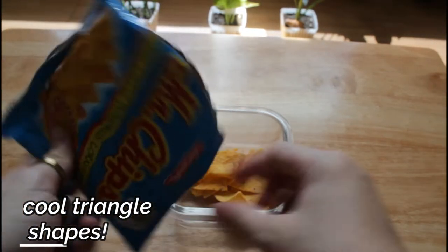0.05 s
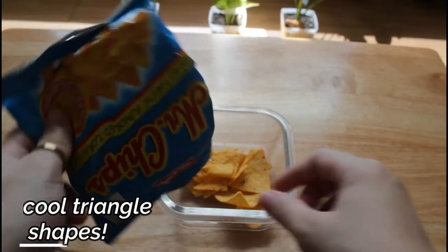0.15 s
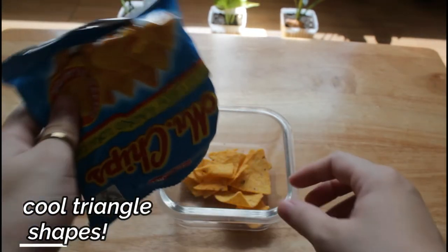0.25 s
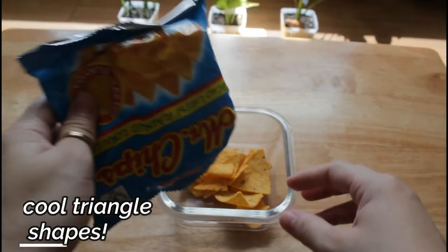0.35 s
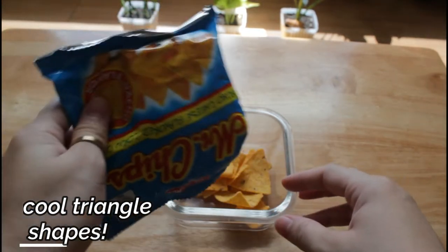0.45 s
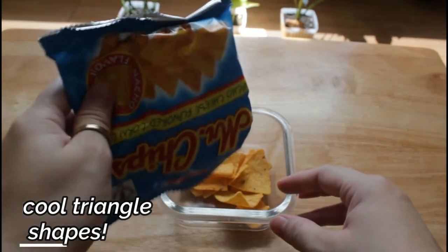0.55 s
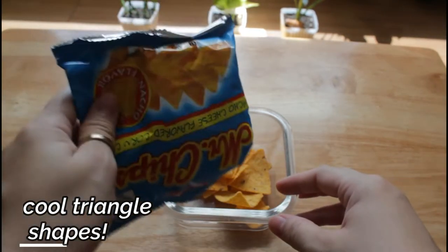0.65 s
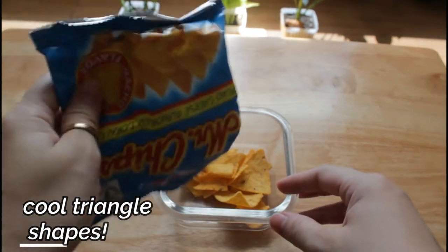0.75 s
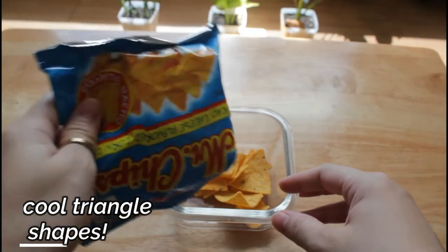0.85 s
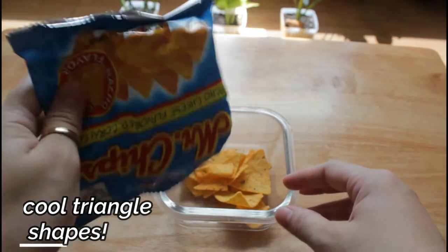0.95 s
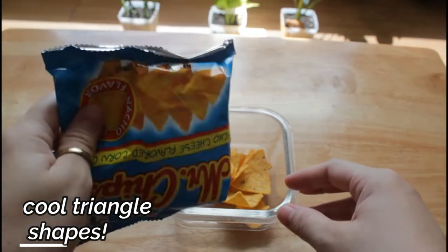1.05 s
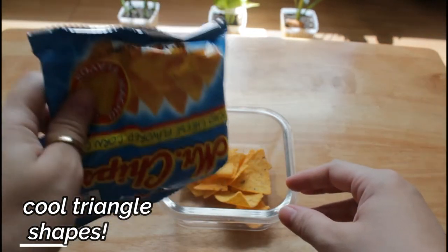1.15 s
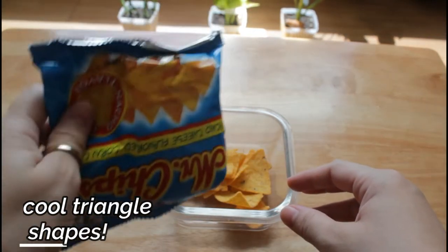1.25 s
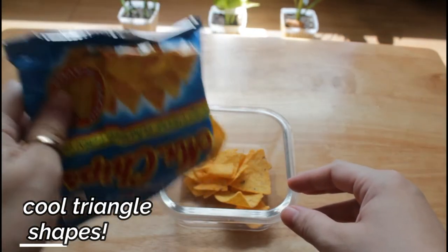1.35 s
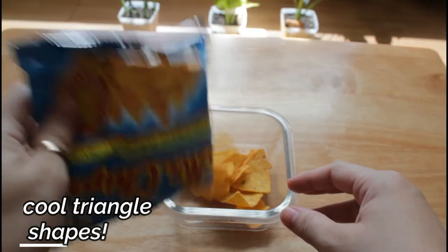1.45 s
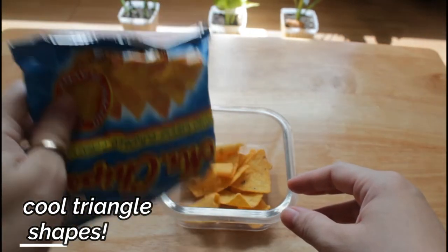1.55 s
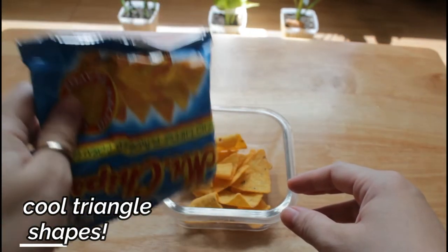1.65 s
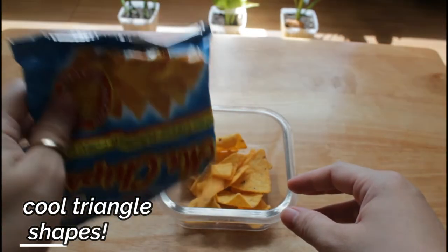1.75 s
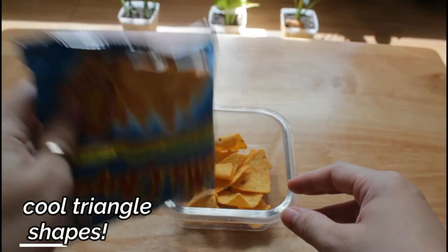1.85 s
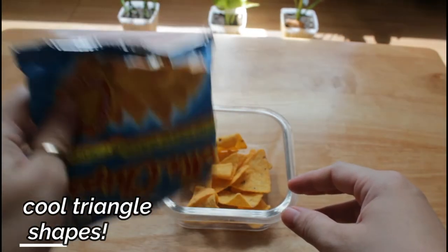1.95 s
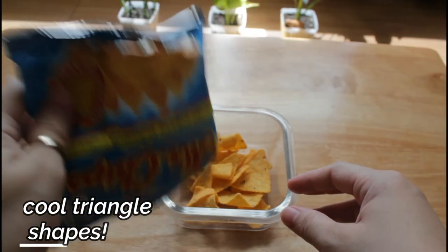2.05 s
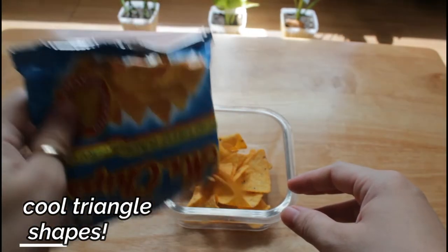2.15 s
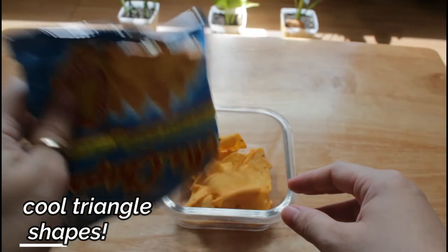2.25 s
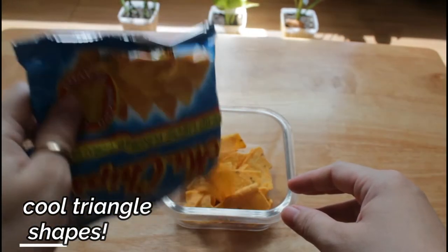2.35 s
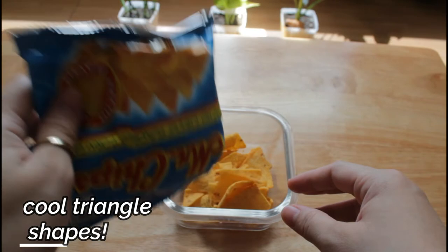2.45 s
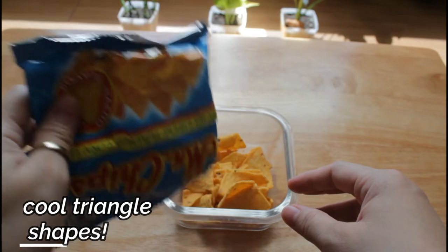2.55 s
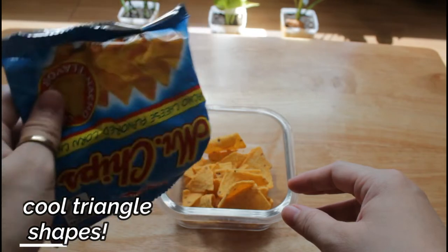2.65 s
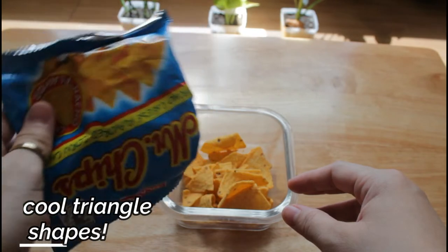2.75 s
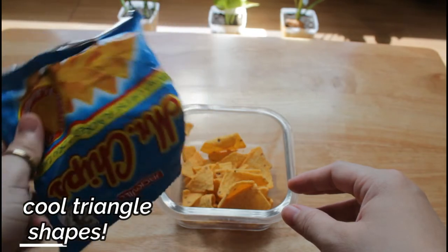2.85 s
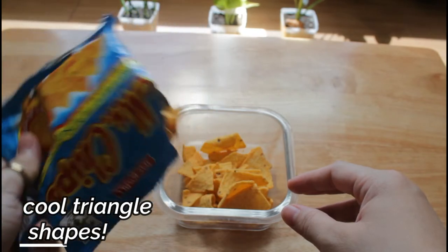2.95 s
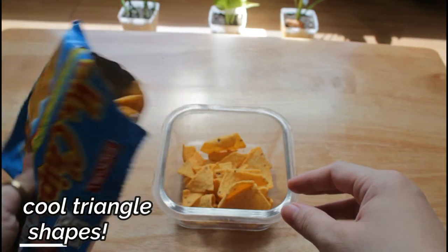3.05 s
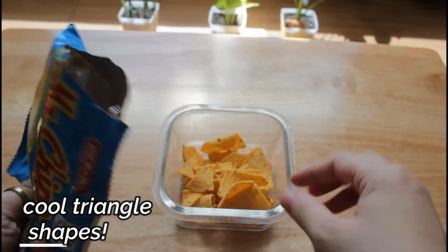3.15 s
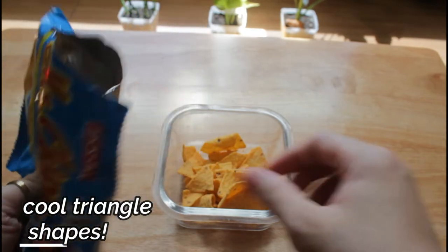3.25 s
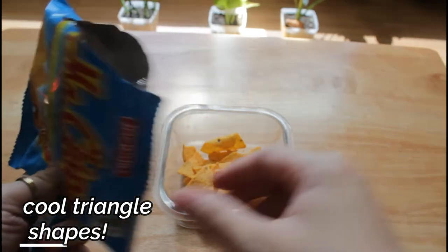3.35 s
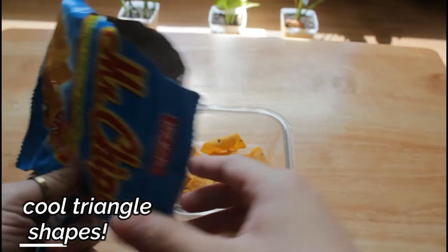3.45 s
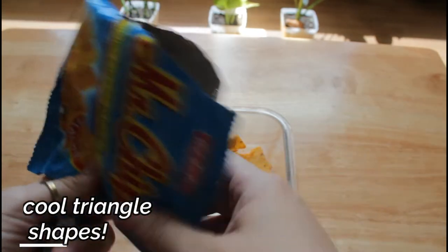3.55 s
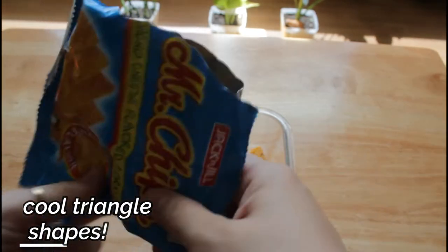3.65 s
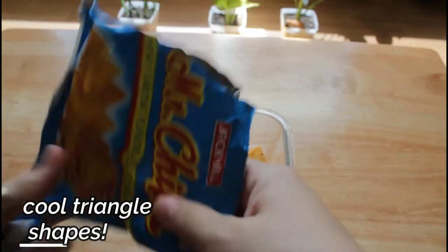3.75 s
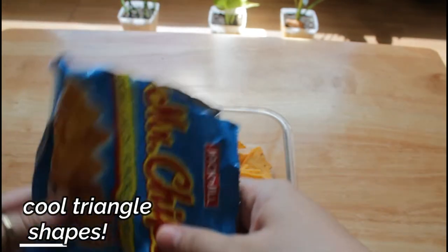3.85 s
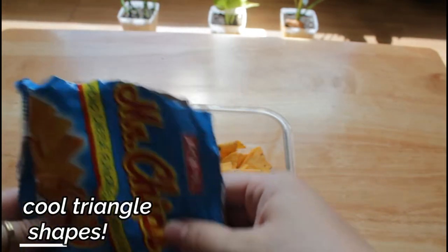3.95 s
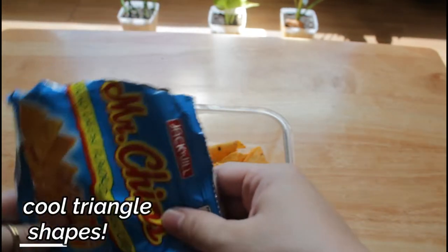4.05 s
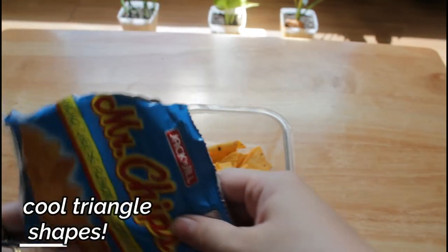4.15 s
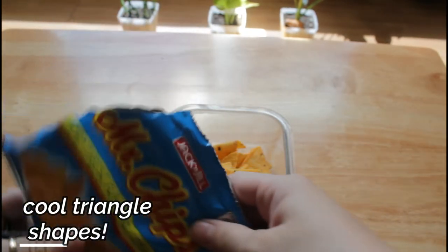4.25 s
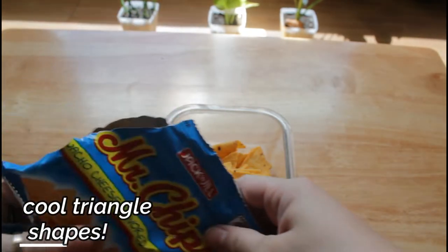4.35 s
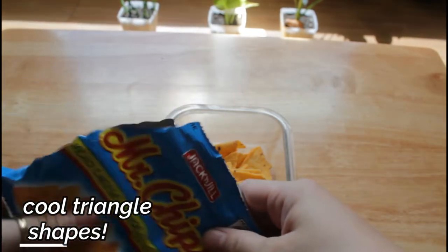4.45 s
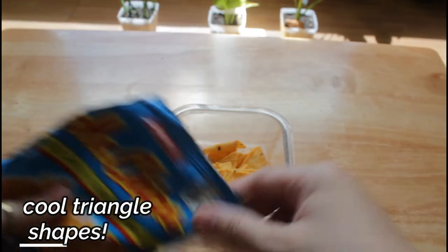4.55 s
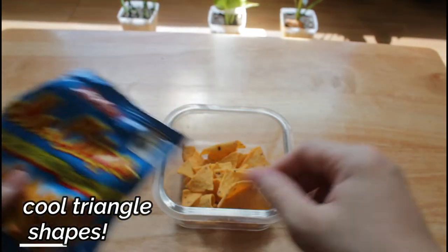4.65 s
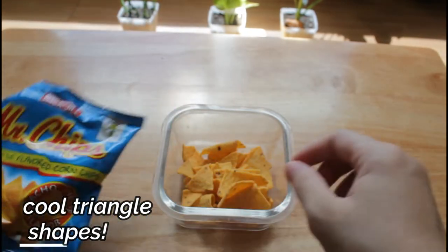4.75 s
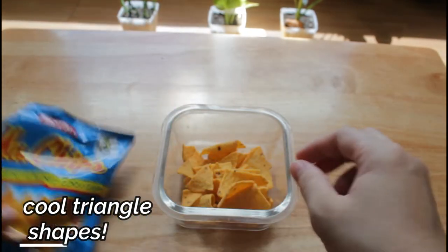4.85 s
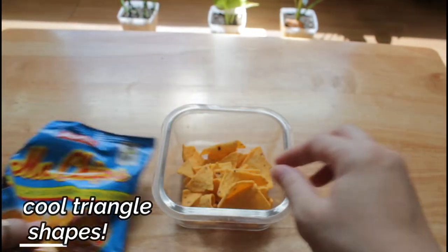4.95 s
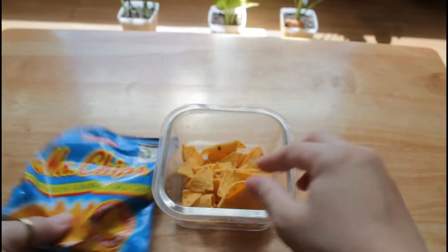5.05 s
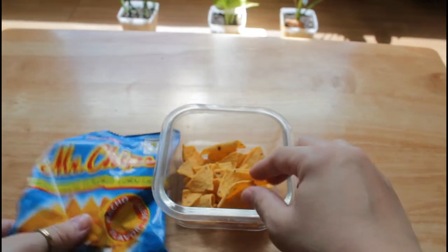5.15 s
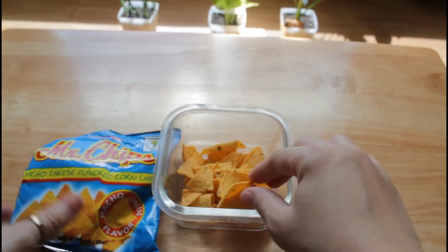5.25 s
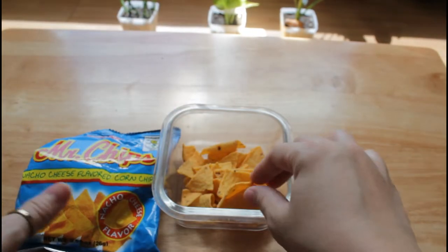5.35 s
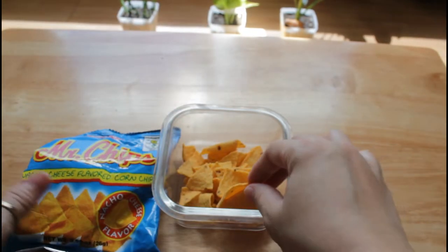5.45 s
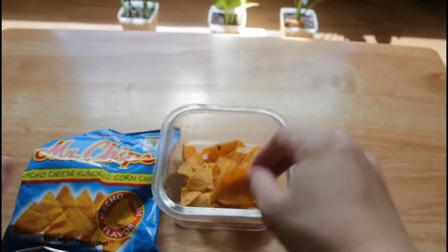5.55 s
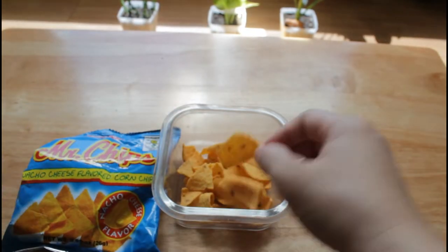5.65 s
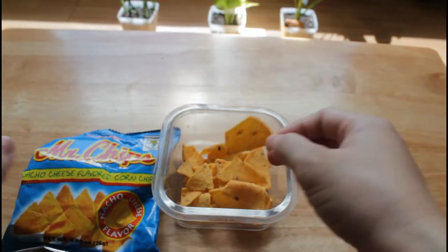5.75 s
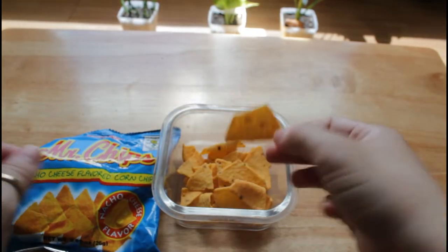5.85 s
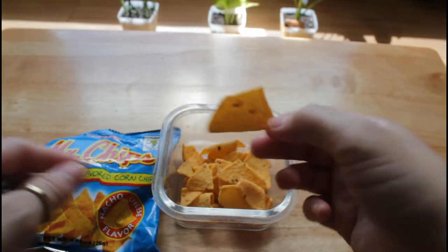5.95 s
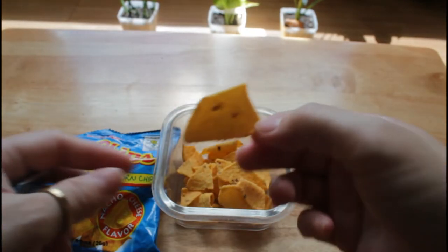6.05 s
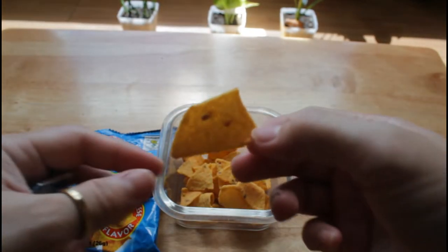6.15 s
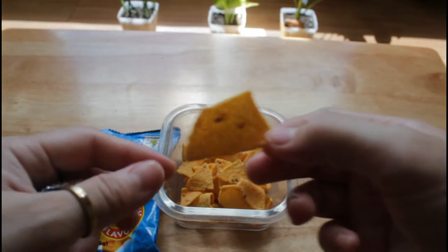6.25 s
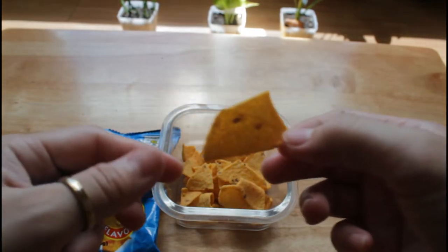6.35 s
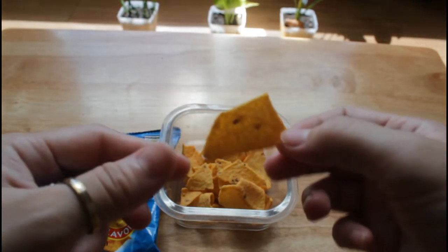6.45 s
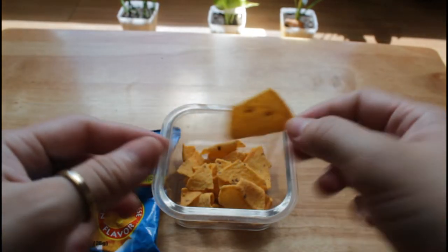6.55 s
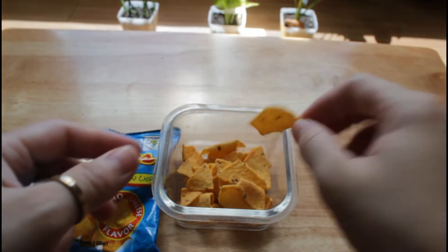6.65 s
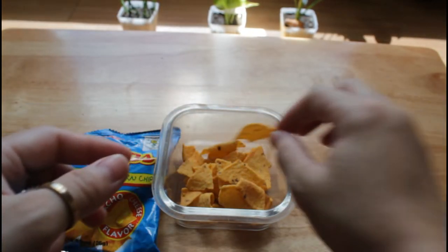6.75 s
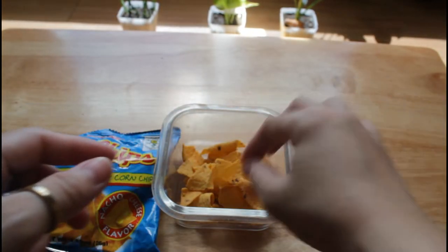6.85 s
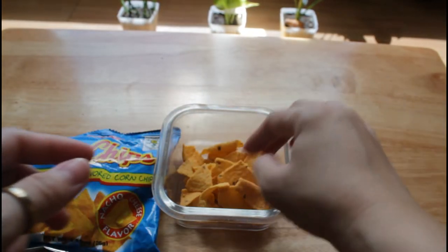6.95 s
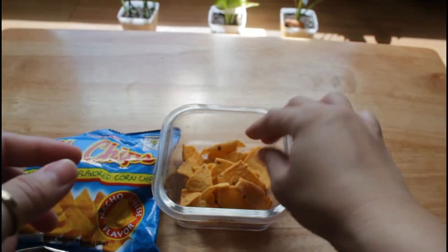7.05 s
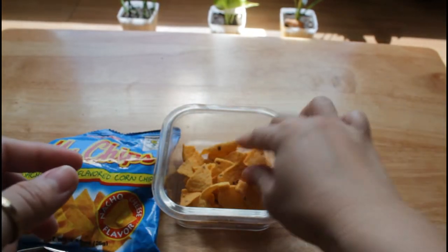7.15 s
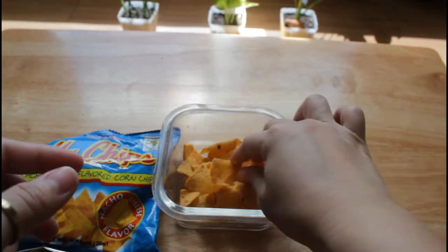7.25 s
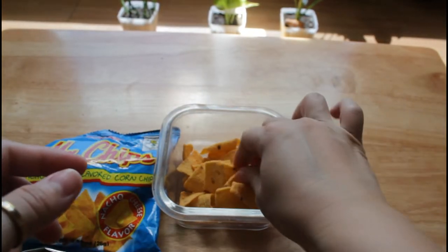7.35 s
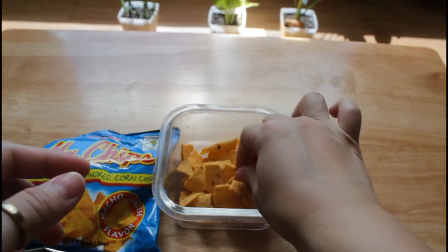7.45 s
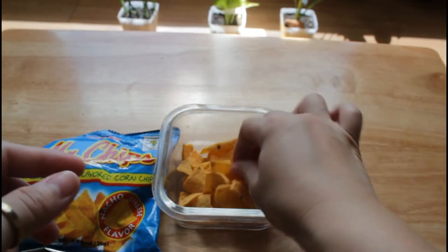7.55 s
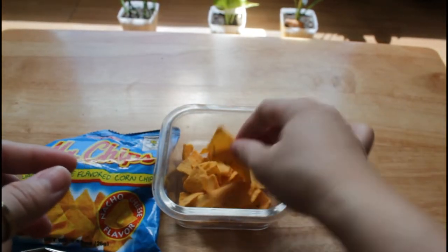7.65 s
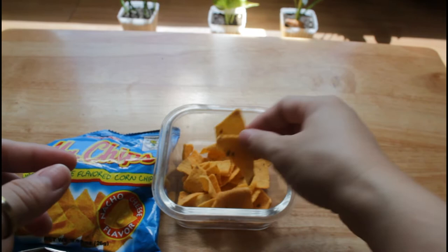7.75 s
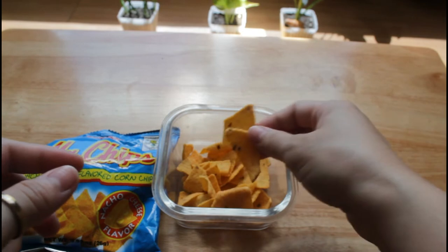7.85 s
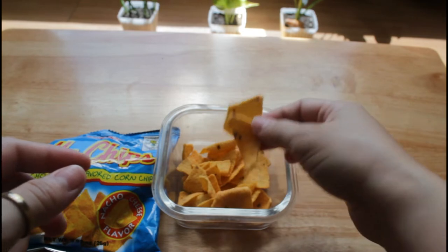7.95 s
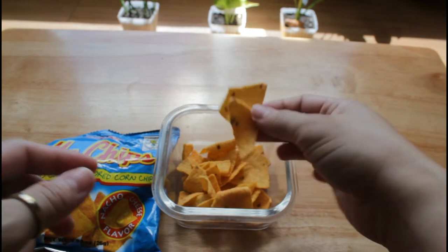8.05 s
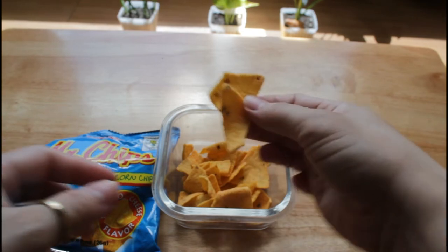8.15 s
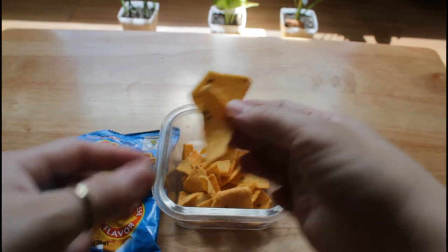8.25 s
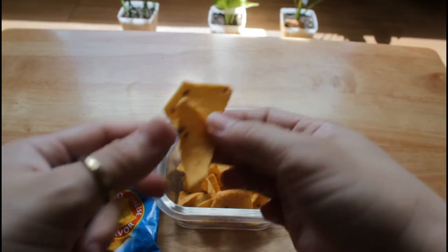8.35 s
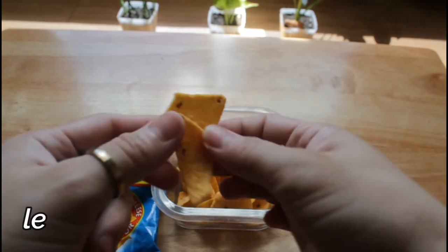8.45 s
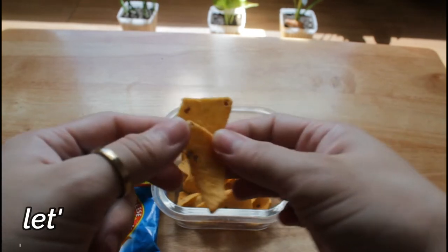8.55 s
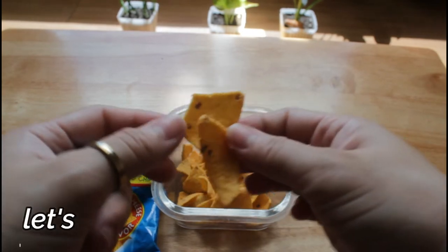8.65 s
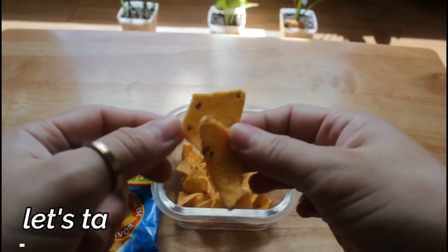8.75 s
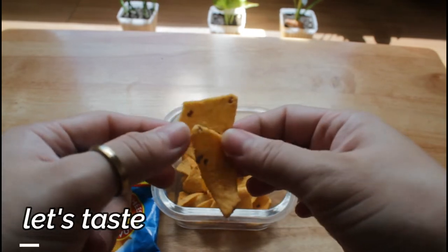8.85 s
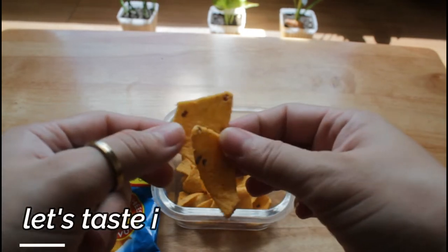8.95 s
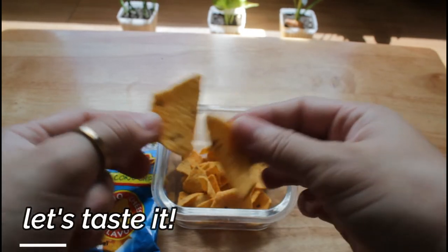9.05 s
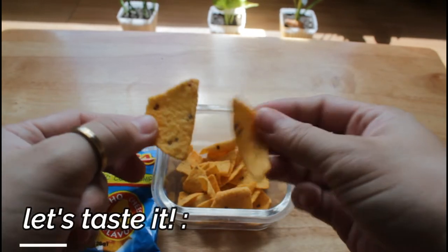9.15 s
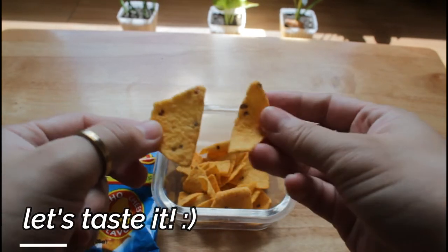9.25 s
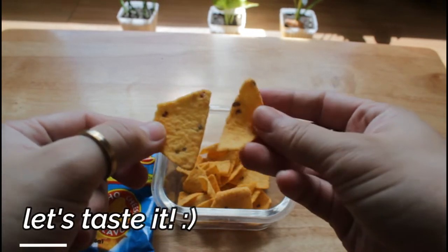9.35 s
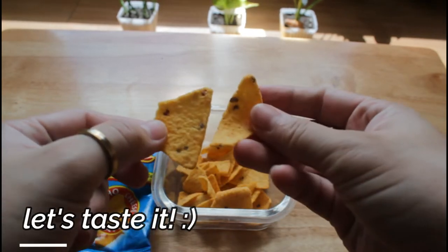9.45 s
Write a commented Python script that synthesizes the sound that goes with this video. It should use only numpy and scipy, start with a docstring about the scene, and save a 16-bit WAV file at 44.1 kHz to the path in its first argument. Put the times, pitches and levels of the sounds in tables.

```python
"""Foil creases snap and corn chips click as a snack bag is shaken over a glass bowl, then handled and laid down.
The place is a small hard room; later fingers pick chips from the bowl, and two spells of air buffet the microphone.
Creases and chips are paired resonances rung by short noise bursts, rustles are clouds of tiny clicks, and
the room is a set of decaying noise tails. Gusts and a thin hiss are shaped noise, all on the left channel.
The right channel carries only a wavering wash of noise."""
import sys
import numpy as np
from scipy import signal
from scipy.fft import rfft, irfft, next_fast_len
from scipy.io import wavfile
from scipy.ndimage import uniform_filter1d, minimum_filter1d, map_coordinates

SR = 44100
rng = np.random.default_rng(int(sys.argv[2]) if len(sys.argv) > 2 else 0)


def wrap_up_sound(samples):
    """Save the sound to the file named by the first command line argument, as 16-bit audio."""
    columns = np.atleast_2d(samples).T
    # keep every value between -1 and 1, then stretch to whole-number steps
    tamed = np.clip(columns, -1, 1)
    steps = np.round(tamed * 32767).astype(np.int16)
    wavfile.write(sys.argv[1], SR, steps)


N = 419391  # length in samples
SNAP_S = 0.004  # time over which a click's level is stated


def amp(db):
    """Decibels to gain."""
    return 10 ** (np.asarray(db) / 20)


def unit(x):
    """Scale each row to rms 1."""
    return x / np.sqrt(np.mean(x ** 2, axis=-1, keepdims=True) + 1e-20)


def along(points, hz):
    """Read (frequency, value) points on a log frequency axis."""
    f, v = np.transpose(points)
    return np.interp(np.log(hz + 1), np.log(f + 1), v)


def curves(rows):
    """Turn each column after the time into one value per sample."""
    s, *columns = np.transpose(rows)
    t = np.arange(N) / SR
    return [np.interp(t, s, column) for column in columns]


def wobble(rate):
    """A smooth random curve with rate knots a second."""
    knots = rng.standard_normal(int(N * rate / SR) + 4)
    return map_coordinates(knots, [np.arange(N) * rate / SR])


def filtered(x, response):
    """Multiply the spectrum of each row by a response of frequency."""
    n = x.shape[-1]
    m = next_fast_len(n + 256)
    spectrum = rfft(x, m) * response(np.fft.rfftfreq(m, 1 / SR))
    return irfft(spectrum, m)[..., :n]


def resonance(hz, centre, width):
    """The response of one damped mode, with unit gain at its centre."""
    return 1j * hz * width / (centre ** 2 - hz ** 2 + 1j * hz * width)


def noise(colour, patchy_db):
    """Coloured noise of rms 1, with random gain over patches of time and frequency."""
    z = signal.stft(rng.standard_normal(N), nperseg=512)[2]
    field = uniform_filter1d(rng.standard_normal(z.shape), size=8, axis=0)
    field = uniform_filter1d(field, size=14, axis=1)
    patch_gain = amp(patchy_db * field / field.std())
    patched = signal.istft(z * patch_gain, nperseg=512)[1][:N]
    return unit(filtered(patched, lambda hz: amp(along(colour, hz))))


# Base level of the right-channel wash: start_s [s], body_db [dB], treble_db [dB]
WASH_LEVELS = [(0, -49.5, -50.5), (0.85, -50.5, -51.5), (1.6, -52, -48), (2.8, -50.5, -50.5),
               (3.7, -50.5, -47), (4.2, -51.5, -51), (5.65, -52.5, -54), (6.7, -51, -53.5),
               (8.3, -52.5, -53), (8.6, -50.5, -52), (9.5, -51.5, -51)]
# Relative spectra of its two layers: frequency_hz [Hz], density_db [dB per Hz]
WASH_BODY_COLOUR = [(20, -37), (60, -14.5), (120, -10.5), (400, -9.5), (600, -6.5), (1200, 1), (1800, -1.5),
                    (2600, -7), (4500, -28)]
WASH_TREBLE_COLOUR = [(1000, -40), (2000, -3.5), (2800, 1), (4500, -2), (7000, -5.5), (11000, -9),
                      (15000, -12.5)]


def wash():
    """A soft rush: two bands of noise follow slow level curves and waver independently."""
    body_db, treble_db = curves(WASH_LEVELS)
    body_gain = amp(body_db + 0.37 * wobble(19))
    body = body_gain * noise(WASH_BODY_COLOUR, patchy_db=2.0)
    treble_gain = amp(treble_db + 1.5 * wobble(12))
    return body + treble_gain * noise(WASH_TREBLE_COLOUR, patchy_db=2.5)


# Base level of the left-channel hiss: start_s [s], level_db [dB]
HISS_LEVELS = [(0, -58.5), (1.9, -63), (3.3, -58), (5.4, -71.5), (9.5, -51.5)]
# Its relative spectrum: frequency_hz [Hz], density_db [dB per Hz]
HISS_SPECTRUM = [(60, -22), (130, -9), (260, 0), (600, -1.5), (1200, 4), (2800, 0.5), (4500, -3.5),
                 (7000, -9), (11000, -6.5), (15000, -10.5)]


def hiss():
    """A thin, slightly uneven noise that sinks during the handling and swells slowly towards the end."""
    level_db, = curves(HISS_LEVELS)
    return amp(level_db + 0.29 * wobble(13)) * noise(HISS_SPECTRUM, patchy_db=2.0)


# Gusts at the microphone: start_s [s], hold_s [s], level_db [dB], eddy_db [dB relative to the level]
AIR_GUSTS = [(2.782, .03, -45.5, -36), (2.902, 0.025, -31.5, -29), (2.958, 0.099, -30.5, -30),
             (3.161, 0.013, -40.5, -23), (3.228, 0.027, -29.5, -12), (3.32, 0.012, -40.5, 1.5),
             (3.398, 0.042, -40, -14), (3.793, 0.024, -29, -8), (3.85, 0.043, -36.5, -12),
             (3.96, 0.095, -50.5, -16), (4.227, 0.015, -57, -16), (8.57, 0.24, -61, -11),
             (8.916, 0.059, -35, -27), (9.098, .2, -35, -13.5), (9.295, 0.16, -25.5, -14),
             (9.472, 0.016, -16.5, -15.5)]
# Relative spectra of the main turbulence and small eddies: frequency_hz [Hz], density_db [dB per Hz]
AIR_SPECTRUM = [(15, -43), (30, -13.5), (62, -0.5), (90, -5), (140, -5.5), (250, -26.5), (400, -36),
                (1300, -90)]
EDDY_SPECTRUM = [(60, -21), (180, 1), (350, -15), (700, -24), (2000, -75)]
GUST_RISE_DB_PER_S, GUST_FALL_DB_PER_S = 748, 369
CALM_DB = -86  # level of the air between gusts


def buffeting(flutter_db=1.0, flutter_rate=45):
    """Low turbulence at the microphone: gusts rise fast, flutter and fall; small eddies sound higher."""
    t = np.arange(N) / SR
    air, eddies = np.full(N, amp(CALM_DB)), np.zeros(N)
    for start, hold, level_db, eddy_db in AIR_GUSTS:
        rise_db = GUST_RISE_DB_PER_S * np.maximum(start - t, 0)
        fall_db = GUST_FALL_DB_PER_S * np.maximum(t - start - hold, 0)
        gust = amp(level_db - rise_db - fall_db)
        air = np.maximum(air, gust)
        eddies = np.maximum(eddies, amp(eddy_db) * gust)
    flutter = unit(amp(flutter_db * wobble(flutter_rate)))
    turbulence = air * noise(AIR_SPECTRUM, patchy_db=1.5)
    return flutter * (turbulence + eddies * noise(EDDY_SPECTRUM, patchy_db=-0.5))


# Decay of the room's tail: frequency_hz [Hz], t60_s [s to fall 60 dB]
ROOM_DECAY = [(300, 0.77), (1200, 0.4), (3500, 0.41), (8000, 0.42), (15000, 0.57)]


def room(x, early_db=3.5, early_t60=0.11, gap=0.0029, count=4, size=2048):
    """Table and walls answer densely, then in a short tail; the sound takes a few such answers in turn."""
    hz, t, z = signal.stft(rng.standard_normal((count, SR // 2)), SR, nperseg=256)
    decay = amp(-60 * t / along(ROOM_DECAY, hz)[:, None])
    tails = signal.istft(z * decay, SR, nperseg=256)[1]
    t = np.arange(tails.shape[1]) / SR
    early = 1 + amp(early_db - 60 * t / early_t60)
    tails = tails * early * np.clip(t / gap - 0.5, 0, 1)  # silent at first, then fading in
    tails = tails / np.linalg.norm(tails, axis=1, keepdims=True)
    # blocks of samples take the tails in turn, with short crossfades
    turn = np.arange(N) // size % count
    chosen = (turn == np.arange(count)[:, None]).astype(float)
    share = uniform_filter1d(chosen, size=256, axis=1)
    sent = x * np.sin(np.pi / 2 * share)
    return signal.oaconvolve(sent, tails, axes=1).sum(0)[:N]


def clicks(s, db, pitch_hz, upper_hz, upper_db, width, crack_db, cycles, crack_t60,
           crack_hz=11000, flip=3.3, lead_db=-11, lead_t60=0.011, size=640):
    """A stiff facet flips or is struck: flip and chatter ring two resonances; its edge cracks in the treble."""
    lead = size // 5  # samples before time zero
    t = (np.arange(size) - lead) / SR
    chatter, upper_chatter, edge = rng.standard_normal((len(s), 3, size)).transpose(1, 0, 2)
    relative_width = np.maximum(width, 0.1)[:, None]

    def burst(t60):
        """Noise swells for a few milliseconds up to time zero, then dies away."""
        return amp(np.where(t < 0, lead_db + 60 * t / lead_t60, -60 * t / t60))

    def ring(centre, chatter):
        """Chatter lasts a set number of cycles, so low resonances settle more slowly than high ones."""
        push = chatter * burst(cycles / centre) + flip * (t == 0)
        return unit(filtered(push, lambda hz: resonance(hz, centre, relative_width * centre) ** 2))

    body = ring(pitch_hz[:, None], chatter)
    body = body + amp(upper_db)[:, None] * ring(upper_hz[:, None], upper_chatter)
    crack = filtered(edge * burst(crack_t60), lambda hz: resonance(hz, crack_hz, 1.06 * crack_hz) ** 3)
    waves = body + amp(crack_db)[:, None] * unit(crack)
    # from rms over the whole window to a level over SNAP_S
    waves = waves * amp(db)[:, None] * np.sqrt(SNAP_S * SR / size)
    at = (np.maximum(s, 0) * SR).astype(int)[:, None] + np.arange(size)
    return np.bincount(at.ravel(), waves.ravel(), N + lead)[lead:N + lead]


# Hand movements, foil flexing and chips sliding, before the scatter and level offset in rustle():
# start_s [s], end_s [s], level_db [dB], pitch_hz [Hz]
HAND_MOVEMENTS = [(0.0, 0.028, -40.5, 1800), (0.206, 0.301, -44.5, 2200), (0.44, 0.522, -42.5, 1610),
                  (0.549, 0.616, -46, 1450), (0.668, 0.755, -42, 1390), (0.862, 0.917, -42, 1920),
                  (1.075, 1.136, -33.5, 1520), (1.145, 1.204, -39.5, 1690), (1.523, 1.587, -36, 1340),
                  (1.922, 2.048, -40.5, 1730), (2.146, 2.206, -40, 1770), (2.226, 2.302, -46, 2280),
                  (2.302, 2.42, -42.5, 2620), (2.499, 2.659, -46.5, 1660), (3.192, 3.325, -37.5, 1830),
                  (3.463, 3.541, -42, 2880), (3.655, 3.764, -33.5, 1490), (3.763, 3.895, -40, 2000),
                  (3.936, 4.069, -36, 1980), (4.184, 4.453, -44.5, 1900), (4.459, 4.586, -37, 2100),
                  (4.79, 4.864, -43, 2220), (4.94, 4.984, -34.5, 2410), (5.087, 5.121, -40.5, 2920),
                  (5.153, 5.196, -41, 2830), (5.23, 5.324, -37, 1220), (6.945, 7.008, -52, 2810),
                  (8.451, 8.567, -53.5, 1880)]
RUSTLE_CRACK_DB = -14.5  # base treble crack relative to each tiny click


def rustle(spread_db=6, pitch_spread=0.35, level_db=-4.0, width=0.56, lowest_hz=950,
           upper_ratio=1.66, upper_db=-7, colour_db=4, brighten=0.51, count=60):
    """Each movement sets off a cloud of tiny clicks of scattered size, pitch and colour."""
    start, end, db, pitch_hz = np.transpose(HAND_MOVEMENTS)[:, :, None]
    shape = (len(HAND_MOVEMENTS), count)
    progress = rng.random(shape)
    s = start + (end - start) * progress
    # the clicks grow as the hand speeds up, and shrink as it stops
    speed = np.sqrt(np.sin(np.pi * progress))
    sizes = unit(speed * amp(spread_db * np.minimum(rng.exponential(size=shape), 3)))
    # share the movement's energy among its clicks
    energy = sizes ** 2 * (end - start) / (count * SNAP_S)
    grain_db = db + level_db + 10 * np.log10(energy + 1e-12)

    def scatter(hz):
        """Scatter pitches around a centre, within limits."""
        return np.clip(hz * np.exp(pitch_spread * rng.standard_normal(shape)), lowest_hz, SR / 4)

    def vary(base_db):
        """Harder movements give brighter clicks, with a random spread."""
        return base_db + brighten * (db - db.mean()) + colour_db * rng.standard_normal(shape)

    columns = [s, grain_db, scatter(pitch_hz), scatter(upper_ratio * pitch_hz),
               vary(upper_db), np.full(shape, width), vary(RUSTLE_CRACK_DB)]
    return clicks(*map(np.ravel, columns), cycles=9.9, crack_t60=0.0045)


# Chips that ring on after a knock, one row a tone, before the foil colour:
# start_s [s], level_db [dB at the start], pitch_hz [Hz]
CHIP_CLINKS = [(1.6194, -17.5, 1495), (1.6204, -15.5, 2850), (6.047, -33.5, 2540)]
CLINK_T60 = 0.038  # seconds to fall 60 dB


def clinks():
    """A brittle chip rings with pure tones that die almost at once."""
    out = np.zeros(N)
    t = np.arange(SR // 10) / SR
    for start, level_db, pitch_hz in CHIP_CLINKS:
        tone = amp(level_db - 60 * t / CLINK_T60) * np.sin(2 * np.pi * pitch_hz * t)
        out[round(start * SR):][:len(t)] += tone
    return out


# Chips knocking in the bag or bowl, before the foil colour: start_s [s], level_db [dB over 4 ms],
# pitch_hz [Hz], upper_hz [Hz, second resonance], upper_db [dB relative to the level]
CHIP_KNOCKS = [(0.4503, -33, 1620, 5300, -4), (0.467, -27, 1550.0, 5340.0, -20),
               (0.55, -31.5, 1660.0, 8740.0, -14), (0.675, -35, 1300, 1750, -3),
               (0.688, -25.5, 1480, 1940, -16), (0.7452, -40, 1400, 2000, -6), (0.8678, -45, 1700, 2600, 5),
               (0.8926, -38, 1590, 2600, 6), (1.0535, -41, 2800.0, 3220.0, 7.5),
               (1.0823, -30.5, 1640, 2100, 1.5), (1.093, -21, 1800.0, 2810.0, -12),
               (1.186, -32, 1700, 3600.0, -13), (1.5027, -41, 1750, 3750, 3),
               (1.5114, -32, 4840, 11460.0, -8), (2.0286, -25, 1430, 2450, -1.5),
               (2.178, -33, 1730, 2580, -3), (2.2339, -30, 1630, 2360, 6.5),
               (3.4573, -23.5, 2400, 4220, -0.5), (3.528, -40, 2510, 4300, -2), (3.8457, -31, 890, 3070, 3),
               (3.8601, -32.5, 1710, 3370, 1), (3.9568, -24, 1280, 5400, 2), (4.0309, -35, 1700, 4000, -4),
               (4.0657, -24.5, 4470, 9710.0, -5), (4.197, -43, 890, 3040, 14.5),
               (4.451, -29, 1600.0, 3580, -10), (4.4894, -24, 1930, 4260, -5),
               (4.808, -28, 1430, 2130, 4.5), (4.8151, -29.5, 1530, 2470, 1.5), (5.151, -24, 2770, 3700, 0),
               (5.2638, -22, 1440, 3300, -6), (5.7068, -47.5, 6000, 12000, 2), (6.0482, -47, 4200, 6400, 0),
               (6.083, -45, 2600, 4710, 0), (6.9517, -41, 3170, 4100, 0.5), (9.0927, -44, 3000, 11000, 2)]
CHIP_WIDTH, CHIP_CRACK_DB = 0.35, -22.5  # resonance width / pitch; treble crack relative to the level


def chip_clicks(extra_width):
    """Chips knock together with a clear pitch: narrow resonances, widened by extra_width, and a weak crack."""
    each = np.ones(len(CHIP_KNOCKS))
    return clicks(*np.transpose(CHIP_KNOCKS), (CHIP_WIDTH + extra_width) * each, CHIP_CRACK_DB * each,
                  cycles=23, crack_t60=0.0044)


# Foil creases flipping, before the foil colour: start_s [s], level_db [dB over 4 ms], pitch_hz [Hz],
# upper_hz [Hz, second resonance], upper_db [dB relative to the level],
# width [resonance width / pitch], crack_db [dB relative to the level, treble crack]
CREASES = [(0.2841, -30.5, 2080, 5860.0, -5, 1.1, -36), (0.435, -28, 2010, 5340, 5, 0.85, 8.5),
           (0.5696, -19.5, 1770, 3700, -15, 0.49, -20), (0.695, -24, 1350, 4050, -9.5, 0.61, -20),
           (1.137, -24, 1140, 3100, 4.5, 1.4, -11), (1.412, -37, 1540, 4730, 8.5, 0.58, -10),
           (1.5629, -28, 1180, 5470, 10, 0.57, 12), (1.6205, -24.5, 1370, 4340, 3.5, 0.7, 1.5),
           (1.956, -17, 2700, 4760, -4.5, 0.43, -4), (1.965, -23, 1320, 2590.0, -14, 0.61, -16),
           (2.0378, -19.5, 1780, 4300, -5.5, 0.85, -13.5), (2.3824, -38, 1190, 2530, 3, 0.78, -4),
           (3.1796, -32.5, 1400, 3450, 1.5, 0.46, -8), (3.221, -28, 2200, 3800, 1, 1.3, 9),
           (3.302, -29.5, 1780, 4390.0, -8, 2, -7), (3.3124, -25.5, 1370, 3300, -0.5, 1.3, -13),
           (3.662, -30, 1040, 3230.0, -4, 0.7, -21), (3.6678, -29, 895, 2410.0, -4, 0.54, -16),
           (3.6754, -26, 990, 2830.0, -1.5, 0.61, -17), (3.6864, -31, 1450.0, 4240, 2, 1.2, -36),
           (3.7192, -30, 1150.0, 3900.0, -2.5, 2.2, -18), (3.7261, -33, 1110.0, 3520.0, 6.5, 1.2, -1),
           (3.781, -38, 2030.0, 4230, 10.5, 0.8, -4), (3.928, -32.5, 1140, 3000, 5.5, 0.33, -7),
           (3.9435, -20.5, 1330, 3140.0, -3.5, 0.69, -26), (3.949, -20, 2470, 14040.0, 4, 2.8, -31),
           (3.961, -21, 3120, 14040, 11.5, 0.54, 4), (3.9786, -23.5, 1180.0, 2460.0, -9, 1.9, -12),
           (4.004, -27.5, 1470.0, 5090.0, -1, 0.74, -7), (4.016, -28.5, 900.0, 1990, 6.5, 2.1, -16),
           (4.0405, -27, 1830, 5120.0, -0.5, 0.99, 1), (4.22, -21, 1980, 6440, -5, 0.64, -29),
           (4.2329, -25, 2000, 5570.0, -15, 2.2, -32), (4.2903, -32, 1640.0, 4530.0, 2, 1.1, -34),
           (4.3159, -28.5, 1560, 3180, 1.5, 0.72, -9), (4.364, -27.5, 1600, 3900, 3, 0.53, 5),
           (4.398, -30.5, 1470, 4050.0, -3, 1.05, -35), (4.473, -21, 2480, 9800, -6, 0.88, -34),
           (4.4848, -30, 1350, 3440, 8.5, 0.9, -35), (4.507, -36, 1370.0, 2420.0, 12, 1.3, -31),
           (4.5158, -25, 1570, 4420.0, -1, 0.78, -38), (4.5524, -25.5, 1810.0, 4180.0, 5, 1.3, -29),
           (4.559, -30.5, 1350.0, 3570.0, 8.5, 1.5, 6), (4.5634, -32, 1290.0, 3830.0, -7, 0.81, -8),
           (4.57, -35.5, 900.0, 3020.0, 12, 2.3, -6), (4.6193, -32, 2040, 3060.0, -5, 0.72, -18),
           (4.7926, -43, 900.0, 3300.0, 12.5, 2.9, -12), (4.9476, -31.5, 2040, 5820.0, -16, 1.1, -39),
           (4.995, -14.5, 2580, 7450, 1.5, 1.1, -22), (5.2255, -19, 1660, 5300, -3, 0.64, -14),
           (5.28, -23, 1240, 2080, 3, 0.5, -21)]


def foil_snaps(extra_width):
    """Each foil crease flips with two resonances of its own, widened by extra_width, and a treble crack."""
    *columns, width, crack_db = np.transpose(CREASES)
    return clicks(*columns, width + extra_width, crack_db, cycles=26.7, crack_t60=0.0051)


# Colour shared by the bag and chips: frequency_hz [Hz], gain_db [dB]
BAG_COLOUR = [(100, -22), (400, -6.5), (750, -5), (960, 0.5), (1700, 0), (2100, -3.5), (2800, -1),
              (5000, -1), (6500, -3), (9500, -5.5), (11500, -9.5), (15000, -13)]


def coloured(x):
    """Foil and chips share one broad filter, which trims the bass and the top treble."""
    return filtered(x, lambda hz: amp(along(BAG_COLOUR, hz)))


def scene(chips_away_db=-1.5):
    """Bag, chips and air on the left, wash on the right; the walls hear every facet, so answer more broadly."""
    cloud = rustle()
    at_microphone = foil_snaps(0) + chip_clicks(0) + clinks() + cloud
    toward_walls = foil_snaps(0.15) + amp(chips_away_db) * chip_clicks(0.15) + cloud
    bag, away = coloured(np.array([at_microphone, toward_walls]))
    reflections = amp(-7.5) * room(bag) + amp(-4.5) * room(away)
    left = amp(1.45) * bag + reflections + buffeting() + hiss()
    return np.array([left, wash()])


def record(dry, ceiling=0.93, size=128, top_hz=16200):
    """A fast limiter turns down the sharpest peaks; a steep low-pass then removes what lies above top_hz."""
    needed = 1 / np.maximum(np.abs(dry) / ceiling, 1)
    held = minimum_filter1d(needed, size, axis=1)
    gain = uniform_filter1d(held, size // 2, axis=1)
    return filtered(dry * gain, lambda hz: 1 / (1 + (hz / top_hz) ** 120))


dry = scene()
out = record(dry)
wrap_up_sound(out)
```